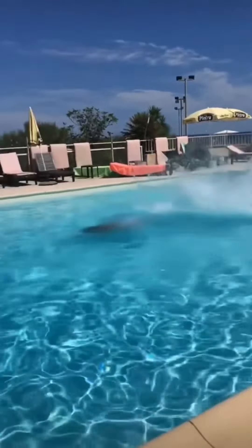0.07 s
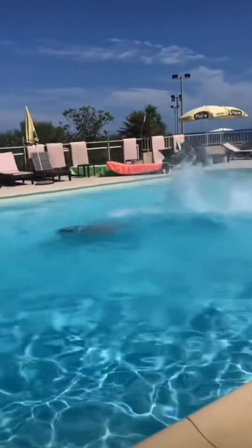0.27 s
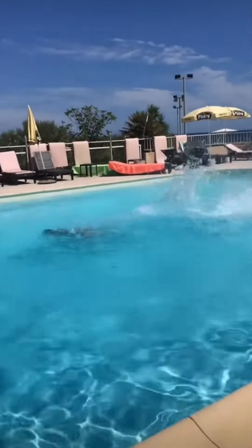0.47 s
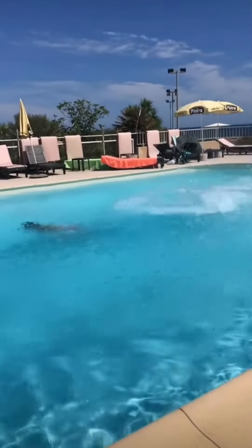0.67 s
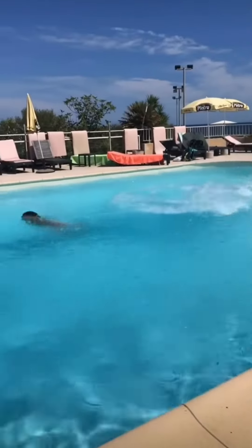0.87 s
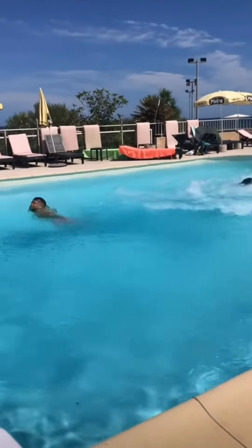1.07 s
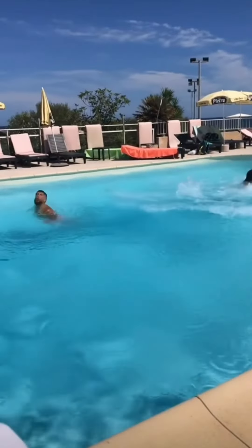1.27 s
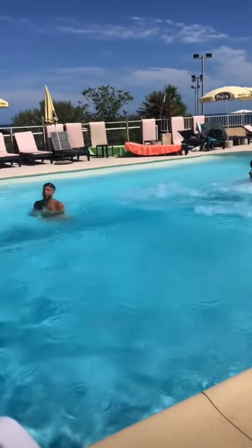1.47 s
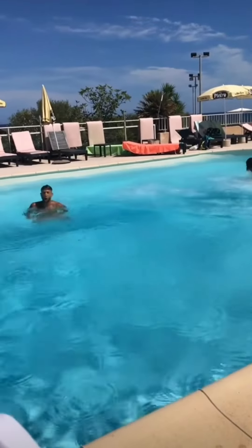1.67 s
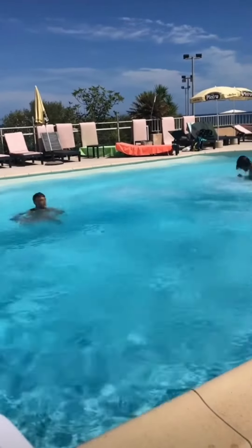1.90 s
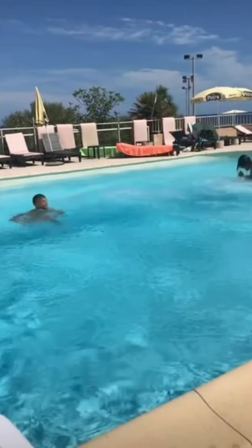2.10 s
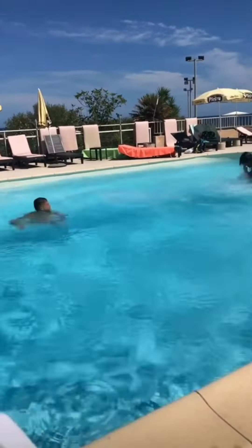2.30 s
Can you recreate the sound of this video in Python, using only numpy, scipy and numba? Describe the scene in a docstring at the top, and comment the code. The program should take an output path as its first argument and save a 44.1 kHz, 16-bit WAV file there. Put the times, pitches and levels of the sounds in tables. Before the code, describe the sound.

Spray from a dive falls back into an outdoor pool as a dense hiss with plinking drops, then dies away. The sound is thin and tinny, with a soft microphone bump, and cuts out briefly before a small slosh.

```python
"""The spray of a dive rains back into an outdoor pool and dies away, heard through a small, thin,
ringing loudspeaker, in mono. Droplets tick on the water and trap small bubbles that ring, merging into
a dense hiss; a few louder drops and bright spatters stand out. Light bumps thud on the microphone over
a faint rumble. Near the end the sound drops out briefly and returns on a new slosh."""
import sys
import numpy as np
from scipy import signal
from scipy.fft import rfft, irfft
from scipy.io import wavfile
from scipy.ndimage import uniform_filter1d
from numba import njit

SR = 44100
rng = np.random.default_rng(int(sys.argv[2]) if len(sys.argv) > 2 else 0)


def dump_mix(stems):
    """Bounce the given channels to the path in sys.argv[1] as a 16-bit WAV at rate SR."""
    frames = np.atleast_2d(stems).T  # one column per channel
    limited = np.clip(frames, -1, 1)  # hard clip at full scale
    pcm = np.round(limited * 32767).astype(np.int16)
    wavfile.write(sys.argv[1], SR, pcm)


N = 103414
TIME = np.arange(N) / SR


def undb(db):
    """Decibels to gain."""
    return 10 ** (np.asarray(db) / 20)


def unit(x):
    """Scale to rms 1."""
    return x / np.sqrt(np.mean(x ** 2))


def band(x, low_hz, top_hz):
    """Gentle band-pass."""
    return signal.sosfilt(signal.butter(2, [low_hz, top_hz], "band", fs=SR, output="sos"), x)


def band_noise(low_hz, top_hz):
    """Band-passed noise at rms 1."""
    return unit(band(rng.standard_normal(N), low_hz, top_hz))


def flicker(rate_hz):
    """Random steps smoothed twice into a waver of rms 1."""
    hold = int(SR / rate_hz)
    steps = np.repeat(rng.standard_normal(N // hold + 1), hold)
    return unit(uniform_filter1d(uniform_filter1d(steps, hold), hold)[:N])


def bursts(table, rise_s):
    """Envelope with a quick rise and an exponential fall for each row."""
    envelope = 0
    for start, db, decay_s in table:
        age = np.maximum(TIME - start, 0)
        envelope += undb(db) * (1 - np.exp(-age / rise_s)) * np.exp(-age / decay_s)
    return envelope


def rumble():
    """A faint low bed at the poolside that wavers and slowly fades."""
    start_db, fade_db_per_s = -77, 1
    return band_noise(45, 200) * undb(start_db - fade_db_per_s * TIME + 0.5 * flicker(rate_hz=9.3))


# Handling bumps, right on the microphone: (time [s], level [dB], decay [s])
MIC_BUMPS = [(.2, -63, 0.034), (.64, -63, .02), (.83, -66, 0.033), (1.245, -50.5, .03), (1.33, -68, 0.066)]

def mic_bumps():
    """Light knocks on the microphone come through as diffuse low thuds."""
    return band_noise(30, 120) * bursts(MIC_BUMPS, rise_s=0.0064)


# Broad, thin response of the small loudspeaker: (frequency [Hz], gain [dB])
SPEAKER_RESPONSE = [(30, -55.5), (140, -47), (185, -34), (240, -28), (500, -22), (1000, -2.5), (2500, -5.5),
                    (4500, -14), (5000, -17.5), (6900, -15), (7400, -25), (8500, -36.5), (10000, -46),
                    (12300, -47.5), (13000, -56), (15100, -59)]
# Its resonances and dips: (frequency [Hz], width [Hz], gain [dB])
SPEAKER_RESONANCES = [(368.2, 93, 7), (988, 13, 0.5), (1151, 150, 3), (1538, 99, 6.5), (1860, 29, 2.5),
                      (1990, 110, 3), (2150, 60, -1), (2413, 110, 5.5), (3023, 67, 2), (3436, 52, -18.5),
                      (3933, 120, 4.5), (4455, 80, 8.5), (5330, 31, 6), (5940, 80, 3.5), (6480, 89, 5),
                      (11750, 1800, 9)]

def speaker_colour(x):
    """The small loudspeaker as a causal filter: little bass, ringing peaks in the middle and treble."""
    freq = np.maximum(np.fft.rfftfreq(8192, 1 / SR), 1)
    knot_hz, knot_db = np.array(SPEAKER_RESPONSE, float).T
    db = np.interp(np.log(freq), np.log(knot_hz), knot_db)
    db += sum(gain / (1 + (2 * (freq - hz) / width) ** 2) for hz, width, gain in SPEAKER_RESONANCES)
    cepstrum = irfft(db * np.log(10) / 20)
    cepstrum[1:4096] *= 2  # fold onto positive time for minimum phase
    cepstrum[4097:] = 0
    impulse = irfft(np.exp(rfft(cepstrum)))[:4096]
    return signal.fftconvolve(x, impulse)[:N]


# Small bright splashes out on the pool: (time [s], level [dB], decay [s])
POOL_SPATTERS = [(.128, -22, 0.018), (.47, -20, .015), (.69, -24, .02), (.745, -24, .02),
                 (1.657, -27.5, 0.017), (1.674, -21, 0.0084), (1.685, -29, .02), (1.735, -31, 0.034)]

def spatters():
    """Short showers of droplets land together, each a burst of bright noise."""
    shower = band(speaker_colour(rng.standard_normal(N)), 2300, 4800)
    return unit(shower) * bursts(POOL_SPATTERS, rise_s=0.0023)


@njit
def bubbles(start_s, hz, gain, cycles, glide):
    """Trapped air rings: each tone swells, then falls 17 dB and rises by the share `glide` in `cycles`."""
    out = np.zeros(N)
    for k in range(len(start_s)):
        first = int(start_s[k] * SR)
        life = cycles * SR / hz[k]
        phase = 0.
        for age in range(min(int(3 * life), N - first)):
            phase += 2 * np.pi * hz[k] * (1 + glide * age / life) / SR
            swell = 1 - np.exp(-age * hz[k] / SR)
            out[first + age] += gain[k] * swell * np.exp(-2 * age / life) * np.sin(phase)
    return out


# Single drops on the pool, clear of the spray: (time [s], level [dB], bubble pitch [Hz])
LOUD_DROPS = [(0.044, -16, 1224), (0.067, -27, 1520), (0.12, -12, 1680), (0.138, -34, 1150),
              (0.204, -5.5, 2450), (0.237, -33, 1433), (0.296, -15, 1590), (0.634, -10, 1780),
              (0.729, -8, 2370), (0.924, -7, 1560), (0.942, -8.5, 1460), (1.059, -38, 1850),
              (1.187, -19, 1720), (1.326, -14.5, 1480), (1.504, -23, 1190), (1.578, -32, 1510),
              (1.61, -15, 1030), (1.675, -34, 2700), (1.688, -25, 1080), (1.918, -23, 1040),
              (1.939, -34.5, 2020), (2.321, -31, 1860)]

def loud_drops():
    """Each drop makes a dull tick on the surface and a short ringing bubble."""
    start_s, db, hz = np.array(LOUD_DROPS, float).T
    gain, bubble_lead_s = undb(db), 0.002005
    tones = bubbles(start_s - bubble_lead_s, hz, gain, cycles=11., glide=0.034)
    ticks = speaker_colour(np.bincount((start_s * SR).astype(int), gain, N))
    ticks *= undb(-3) * gain.max() / np.abs(ticks).max()
    return band(tones + ticks, 1000, 5000)


def droplet_rain(per_s=5000):
    """Steady rain of droplets on water: hiss, ticks and small bubbles, in the small speaker's colour."""
    count = int(per_s * N / SR)
    bubble_at, pitch, tick_at = rng.random((count, 3)).T
    bubble_size, tick_size = np.minimum(rng.exponential(size=(count, 2)), 4).T
    lowest_hz, octaves = 299.9, 5.3
    hz = np.minimum(lowest_hz * 2 ** (octaves * pitch), SR / 4)
    bubble_gain = undb(2.2 * bubble_size) * (hz / lowest_hz) ** 0.81  # higher bubbles start stronger
    tones = bubbles(bubble_at * N / SR, hz, bubble_gain, cycles=14.7, glide=0.064)
    tick_gain = undb(2.5 * tick_size) * np.sign(pitch - .5)  # either polarity
    ticks = np.bincount((tick_at * N).astype(int), tick_gain, N)
    return speaker_colour(rng.standard_normal(N) + undb(-5) * unit(tones) + undb(-7.5) * unit(ticks))


# The falling spray from the poolside, bass band: (time [s], level [dB])
SPRAY_BASS = [(0, -36.5), (.05, -37.5), (.1, -38.5), (.15, -35.5), (.22, -39), (.35, -40), (.52, -44.5),
              (.78, -41.5), (.9, -45.5), (1.4, -47), (1.82, -49), (1.98, -53.5)]
# Its middle band, the strongest: (time [s], level [dB])
SPRAY_MIDDLE = [(0, -25), (.05, -22.5), (.1, -22.5), (.19, -18), (.24, -20.5), (.3, -19), (.54, -20.5),
                (.74, -19), (.87, -24), (.94, -20.5), (1.05, -22), (1.3, -25), (1.6, -27), (1.68, -27),
                (1.89, -31), (1.97, -29.5), (1.985, -33)]
# Its treble band: (time [s], level [dB])
SPRAY_TREBLE = [(0, -33.5), (.1, -30.5), (.148, -28.5), (.568, -28), (.666, -29), (.72, -26.5), (.8, -28),
                (.93, -30), (1.184, -34), (1.432, -34), (1.65, -38.5), (1.7, -37), (1.85, -39.5),
                (1.98, -40.5)]
# A new slosh in the pool after the dropout: (time [s], middle [dB], treble [dB], bass [dB])
LATE_SLOSH = [(2.269, -46, -54, -67), (2.29, -37.5, -46, -57), (2.318, -36.5, -44, -63),
              (2.324, -31.5, -38, -44), (2.34, -32.5, -36, -51)]

def spray():
    """The spray rains down and dies away, then the water sloshes; three bands each flicker in level."""
    spectrum = rfft(droplet_rain())
    freq = np.fft.rfftfreq(N, 1 / SR)
    bass_edge_hz, treble_edge_hz = 700, 3300
    bass = 1 / (1 + (freq / bass_edge_hz) ** 12)
    treble = 1 - 1 / (1 + (freq / treble_edge_hz) ** 24)
    bands = (1 - bass - treble, SPRAY_MIDDLE), (treble, SPRAY_TREBLE), (bass, SPRAY_BASS)
    slosh_s, *slosh_levels = np.array(LATE_SLOSH, float).T
    out = 0
    for (share, curve), slosh_db in zip(bands, slosh_levels):
        spray_s, spray_db = np.array(curve, float).T
        level_db = np.interp(TIME, np.append(spray_s, slosh_s), np.append(spray_db, slosh_db))
        level_db += 0.76 * flicker(rate_hz=29.87)
        out += unit(irfft(spectrum * share, N)) * undb(level_db)
    return out


def scene():
    """The pool and the microphone bumps in mono, the same on both sides."""
    mono = spray() + loud_drops() + spatters() + rumble() + mic_bumps()
    return np.tile(mono, (2, 1))


def record(dry):
    """The sound drops out and snaps back over a faint steady noise floor; the top is cut."""
    mute_s, return_s, rise_s, top_hz = 1.988, 2.2675, .003, 15480
    since_mute = np.maximum(TIME - mute_s, 0)
    fade_db = np.maximum(-2300 * since_mute, -40 - 200 * since_mute)  # a plunge, then a slower tail
    comeback = np.clip((TIME - return_s) / rise_s, 0, 1)
    wet = dry * np.maximum(undb(fade_db), comeback)
    wet += undb(-103.5) * rng.standard_normal(N)
    wet += undb(-94.5) * band_noise(11000, top_hz)
    wet += undb(-93.5) * band_noise(45, 1000)
    return signal.sosfilt(signal.ellip(14, .2, 70, top_hz, fs=SR, output="sos"), wet)


dry = scene()
out = record(dry)
dump_mix(out)
```